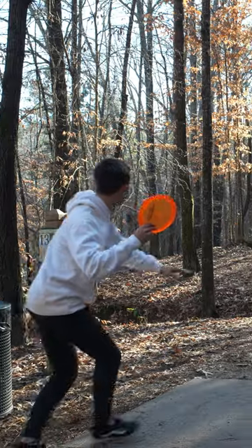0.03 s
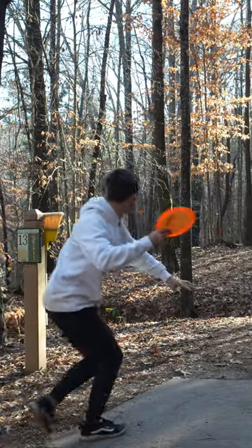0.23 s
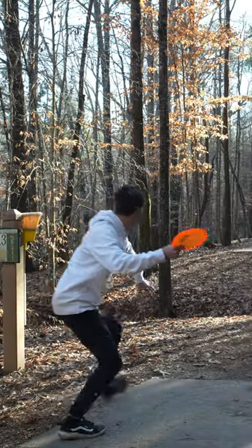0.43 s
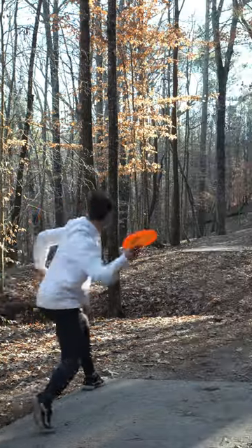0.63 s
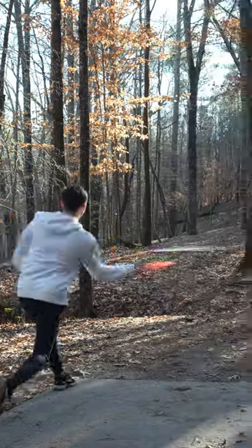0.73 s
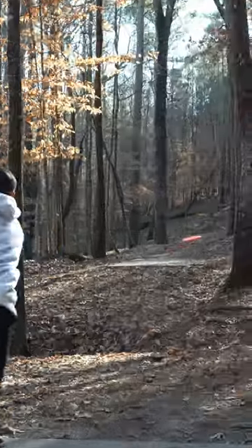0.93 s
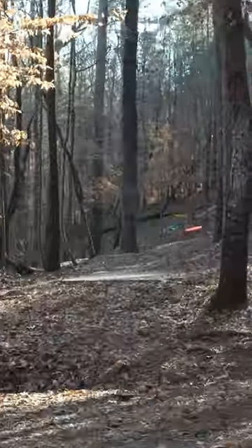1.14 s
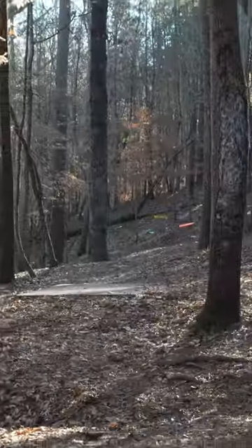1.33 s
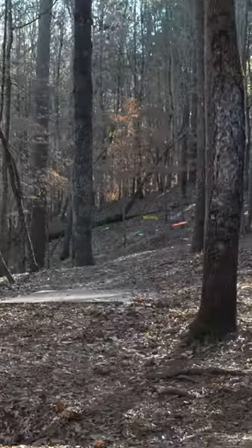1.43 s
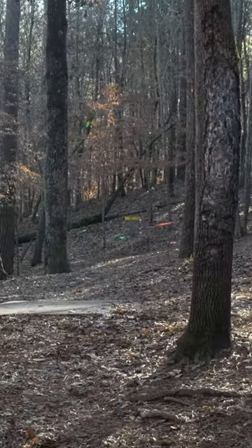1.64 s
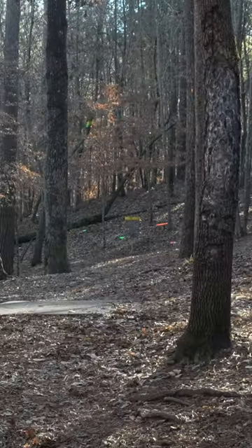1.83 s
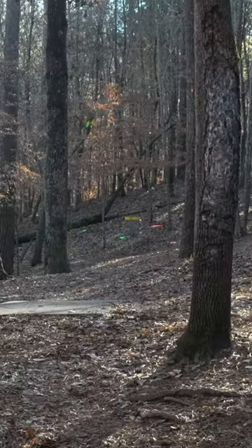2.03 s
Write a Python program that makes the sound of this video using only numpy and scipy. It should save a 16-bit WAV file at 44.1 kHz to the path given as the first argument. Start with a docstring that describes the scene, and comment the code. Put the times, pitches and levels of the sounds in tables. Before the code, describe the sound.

A plastic disc snaps off the fingers as shoes thud and scuff and clothes swish.

```python
"""A disc throw in a quiet wood. The player runs up on a concrete tee pad: steps thud, soles grind on grit,
cloth swishes and rumbles. A foot plants, the clothes flutter and pull taut with the swing, and the plastic
rim whips off the fingers with a sharp snap. Trunks scatter a faint echo of it all. The follow-through
dies down in a few more thuds and scuffs, and a thin hiss comes and goes over the still air."""
import sys
import numpy as np
from scipy import signal
from scipy.fft import rfft, irfft
from scipy.io import wavfile
from scipy.ndimage import uniform_filter1d

SR = 44100
rng = np.random.default_rng(int(sys.argv[2]) if len(sys.argv) > 2 else 0)


def file_out(sig):
    """Save sig as 16-bit WAV at sys.argv[1]."""
    # one column per channel
    cols = np.atleast_2d(sig).T
    # limit, then scale
    lim = np.clip(cols, -1, 1)
    pcm = np.round(lim * 32767).astype(np.int16)
    wavfile.write(sys.argv[1], SR, pcm)


N = 92610

# ringing modes of the plastic rim (pitch [Hz], level [dB], t60 [s])
RIM_MODES = [(2400, -22, .005), (5600, -27, .003), (7500, -19, .0032), (10500, -27, .002),
             (13600, -17.5, .004)]
# thuds of feet and cloth pulled taut (time [s], peak [dB], push length [s], ring [Hz])
THUDS = [(.0945, -42, 0.00077, 695), (.096, -29.5, 0.00078, 715), (0.1745, -37.5, 0.0059, 150),
         (0.248, -39, 0.012, 107), (0.379, -22, 0.007, 99), (0.432, -33, 0.0045, 167),
         (0.506, -24, 0.0054, 135), (.532, -32.5, 0.0028, 230), (0.6002, -28.5, 0.0017, 235),
         (0.6109, -18.5, 0.0052, 105), (0.6234, -20, 0.0052, 92), (.645, -20.5, 0.0019, 370),
         (0.6542, -18.5, 0.0039, 118), (0.6596, -21.5, 0.0025, 224), (0.7065, -37, 0.0038, 172),
         (0.7168, -14, 0.00088, 1020), (0.7828, -14.5, 0.00285, 240), (0.7862, -16, 0.00046, 504),
         (0.8042, -22, 0.0011, 200), (0.8305, -33, 0.012, 80.4), (0.9286, -36.5, 0.0012, 149),
         (1.0192, -15, .0017, 116), (1.2169, -32, 0.0016, 170), (1.223, -33, 0.0043, 108),
         (1.2518, -32.5, .0025, 181), (1.2735, -41, 0.011, 96)]
# soles scuffing the pad (time [s], attack [s], hold [s], t60 [s], level [dB], tilt [dB/octave])
SCUFFS = [(.092, .003, 0.0027, 0.14, -45, -3), (.176, 0.0068, 0.0084, 0.17, -49.5, 2),
          (.36, 0.014, 0.0059, 0.043, -46, -7), (.595, 0.0067, 0.022, 0.13, -49.5, 0),
          (.644, 0.0016, 0.0086, .09, -34, -2.5), (.67, 0.0061, 0.0092, 0.19, -44, 3),
          (.752, 0.018, 0.016, 0.14, -32, -3), (.82, 0.017, 0.046, 0.28, -45, -9.5),
          (.925, 0.017, 0.011, 0.042, -49.5, 1), (1.035, 0.0048, .01, 0.2, -55, 5),
          (1.21, 0.0049, 0.011, 0.3, -56, -2.5), (1.498, 0.024, 0.018, 0.041, -47, -2.5)]
# tone of a sole on concrete (frequency [Hz], gain [dB])
SOLE_EQ = [(150, -10), (450, 4.5), (1000, 4), (1700, -1), (2700, -2), (3800, -8), (6000, -7.5), (9500, -19),
           (16000, -30)]
# ticks of grit and twigs (time [s], peak [dB], centre [Hz])
TICKS = [(.602, -44, 7000), (.6384, -27, 6600), (0.6442, -44, 7600), (.655, -35, 4600), (.666, -29, 5700),
         (.6865, -29, 8500), (0.688, -33, 7000), (0.6909, -30, 5400), (.7174, -23, 2700),
         (.7599, -26.5, 6900), (.7715, -33, 5800), (0.7911, -25, 5000), (.884, -40, 7450),
         (0.936, -33.5, 2860), (0.9446, -34.5, 2770), (1.0198, -39, 8000), (1.0425, -36, 2200),
         (1.255, -33.5, 6950)]
# cloth swishes (time [s], attack [s], hold [s], t60 [s], level [dB], tilt [dB/octave])
SWISHES = [(-.02, 0.027, 0.22, 0.73, -54, -2.5), (.4, 0.017, 0.13, .5, -58.5, -4.5),
           (.62, 0.054, 0.044, 0.46, -47, -4.5), (.755, 0.015, 0.031, 0.26, -43, 1),
           (.82, 0.011, 0.01, 1, -47, -2.5), (1.05, 0.0061, 0.011, 0.12, -46, 5.5),
           (1.074, 0.0047, 0.025, 0.045, -54.5, 0)]
# tone of rubbing cloth (frequency [Hz], gain [dB])
CLOTH_EQ = [(800, -6), (3500, -7.5), (6300, -3), (8000, -3.5), (9300, -6.5), (13500, -5.5), (16000, -14)]
# envelope of the rumble of moving clothes and air (time [s], level [dB])
RUMBLE_ENVELOPE = [(0, -57), (.07, -55), (.15, -50), (0.234, -37.5), (.3, -44.5), (.36, -46.5), (.435, -40),
                   (.485, -50), (.535, -37), (.59, -32.5), (0.661, -24.5), (.725, -23.5), (.765, -29),
                   (.83, -29.5), (.865, -43.5), (0.929, -36.5), (.975, -45), (1.05, -41), (1.12, -88)]
# tone of that rumble (frequency [Hz], gain [dB])
RUMBLE_EQ = [(20, -6), (40, -8.5), (80, 1.5), (150, 4.5), (220, -1), (330, -15), (500, -24), (900, -32),
             (2500, -46)]
# tone of the echo off the trunks (frequency [Hz], gain [dB])
ECHO_EQ = [(60, 13), (250, -3), (1000, 4), (3000, 7), (15000, 16)]
# thin hisses (time [s], attack [s], hold [s], t60 [s], level [dB], centre [Hz], width [octaves])
HISSES = [(1.234, 0.12, 0.11, 0.41, -58, 4600, 0.73), (1.62, 0.17, .4, .4, -63, 4330, 0.24),
          (1.698, 0.24, .15, .4, -60.5, 5400, 0.82)]
# tone of the still air in the wood (frequency [Hz], gain [dB])
AIR_EQ = [(20, -20), (40, -8.5), (70, -3), (110, -1), (180, -2), (300, -7), (550, -9.5), (900, -13),
          (1300, -20), (2000, -23.5), (3200, -27), (4800, -25.5), (8000, -28), (11000, -29), (16000, -31.5)]

TIME = np.arange(N) / SR
FREQS = np.maximum(np.arange(N // 2 + 1) * SR / N, 1)


def undb(db):
    return 10 ** (np.asarray(db) / 20)


def unit_rms(x):
    return x / (np.std(x) + 1e-12)


def peak_at(x, db):
    return x * undb(db) / (np.abs(x).max() + 1e-12)


def equalise(x, curve, tilt=0):
    """Shape x with an EQ curve, tilted in dB per octave; rms 1."""
    hz, db = np.array(curve, float).T
    octave, points = np.log2(FREQS), np.log2(hz)
    gain_db = np.interp(octave, points, db) + tilt * np.maximum(octave - points[0], 0)
    return unit_rms(irfft(rfft(x) * undb(gain_db), N))


def noise_band(hz, octaves):
    """Noise in a steep-sided bell; rms 1."""
    bell = 1 / (1 + (np.log2(FREQS / hz) / octaves) ** 2) ** 2
    return unit_rms(irfft(rfft(rng.standard_normal(N)) * bell, N))


def swell(start, attack, hold, t60):
    """Linear attack, hold, exponential release."""
    age = TIME - start
    release = np.exp(-np.log(1000) * np.maximum(age - attack - hold, 0) / t60)
    return np.clip(age / attack, 0, 1) * release


def burst(start, decay_s):
    """Instant attack, exponential decay."""
    age = TIME - start
    return (age >= 0) * np.exp(-np.maximum(age, 0) / decay_s)


def grain(clicks_per_s=5000, spread_db=3.5):
    """Dense tiny clicks of uneven size over smooth noise."""
    clicks = (rng.random(N) < clicks_per_s / SR) * rng.choice([-1, 1], N)
    sizes = undb(spread_db * np.minimum(rng.exponential(size=N), 5))
    return unit_rms(clicks * sizes) + 0.74 * rng.standard_normal(N)


def rim_snap(start=0.7867, crack_db=-26):
    """The rim leaves the fingers: a crack and a very short ring, neighbouring modes in opposite phase."""
    ring = 0
    for k, (hz, db, t60) in enumerate(RIM_MODES):
        tone = (-1) ** k * np.sin(2 * np.pi * hz * (TIME - start))
        ring += undb(db) * tone * burst(start, t60 / np.log(1000))
    crack = undb(crack_db) * rng.standard_normal(N) * burst(start, decay_s=0.0006)
    return ring + crack


def thuds(damping=0.52, roughness_db=-32.5):
    """Feet land and cloth pulls taut: each push is a pressure pulse that swings back once or twice."""
    out, s = 0, 1j * FREQS
    for start, db, length, hz in THUDS:
        push = np.sin(np.pi * np.clip((TIME - start) / length, 0, 1)) ** 2
        push *= 1 + undb(roughness_db) * rng.standard_normal(N)
        resonant_highpass = s ** 2 / (s ** 2 + damping * hz * s + hz ** 2)
        out += peak_at(irfft(rfft(push) * resonant_highpass, N), db)
    return out


def friction(strokes, curve):
    """Soles or cloth rub in countless tiny slips; each stroke has its own brightness."""
    return sum(undb(db) * swell(start, attack, hold, t60) * equalise(grain(), curve, tilt)
               for start, attack, hold, t60, db, tilt in strokes)


def grit_ticks():
    """Grit and twigs crack in tiny bright bursts."""
    return sum(peak_at(noise_band(hz, octaves=0.67) * burst(start, decay_s=0.00038), db)
               for start, db, hz in TICKS)


def clothes_rumble(smoothing_s=0.0172, flutter_top_db=-37, fade_s=0.14):
    """Moving clothes and air rumble; a higher flutter joins in as the swing gets faster."""
    low = equalise(rng.standard_normal(N), RUMBLE_EQ)
    # flatten the noise's own surges so the envelope sets the dynamics
    low /= np.sqrt(uniform_filter1d(low ** 2, int(smoothing_s * SR)) + 1e-6)
    times, db = np.array(RUMBLE_ENVELOPE).T
    level_db = np.interp(TIME, times, db)
    flutter_db = flutter_top_db + 1.81 * (level_db - db.max())  # swells more steeply than the rumble
    flutter = noise_band(hz=365, octaves=0.64) * undb(flutter_db)
    fade = np.exp(-np.maximum(TIME - times[-1], 0) / fade_s)
    return (low * undb(level_db) + flutter) * fade


def trunk_echo(x, predelay_s=0.025, t60=1, send_db=-24):
    """Many weak reflections off the trees blur into a grainy tail."""
    tail = equalise(grain(), ECHO_EQ) * burst(predelay_s, t60 / np.log(1000))
    tail /= np.sqrt(np.mean(np.abs(rfft(tail)[FREQS < 1000]) ** 2))  # unity rms gain below 1 kHz
    return undb(send_db) * signal.fftconvolve(x, tail)[:N]


def wood_ambience(air_db=-51):
    """A bed of still air among the trees, with thin hisses drifting in and out after the throw."""
    hiss = sum(undb(db) * swell(start, attack, hold, t60) * noise_band(hz, octaves)
               for start, attack, hold, t60, db, hz, octaves in HISSES)
    return undb(air_db) * equalise(rng.standard_normal(N), AIR_EQ) + hiss


def scene():
    """The player up front, the echo and the wood behind, in mono."""
    hits = thuds() + grit_ticks() + rim_snap()
    player = hits + friction(SCUFFS, SOLE_EQ) + friction(SWISHES, CLOTH_EQ) + clothes_rumble()
    return (player + trunk_echo(player) + wood_ambience())[None]


def record(dry):
    """The microphone thins the deepest bass and the recorder cuts the top."""
    low_cut_hz, high_cut_hz = 28, 15650
    thinned = signal.sosfilt(signal.butter(2, low_cut_hz, "high", fs=SR, output="sos"), dry)
    return signal.sosfilt(signal.ellip(10, .2, 80, high_cut_hz, fs=SR, output="sos"), thinned)


dry = scene()
out = record(dry)
file_out(out)
```